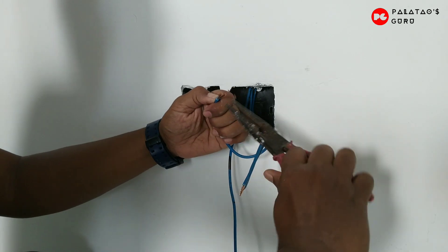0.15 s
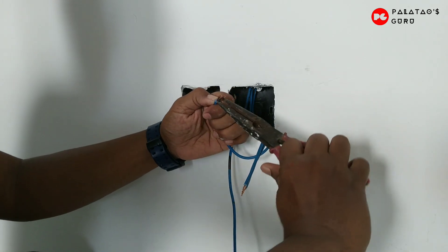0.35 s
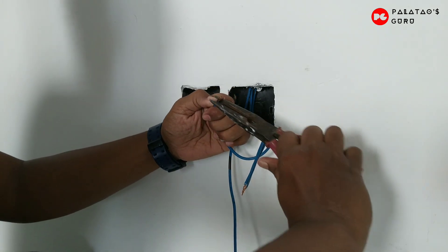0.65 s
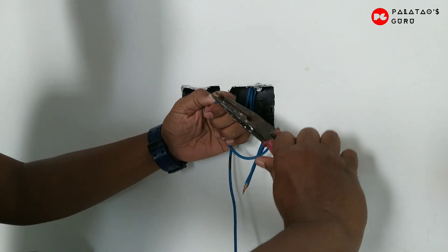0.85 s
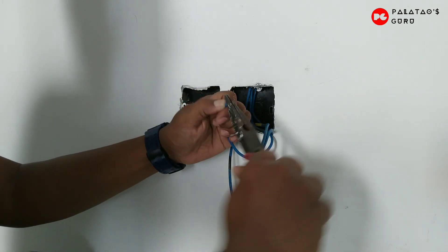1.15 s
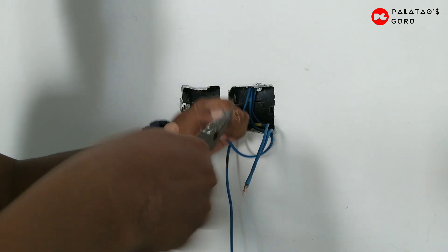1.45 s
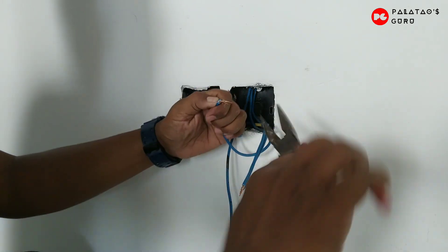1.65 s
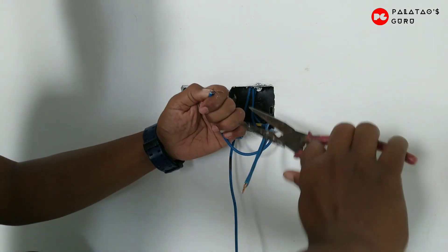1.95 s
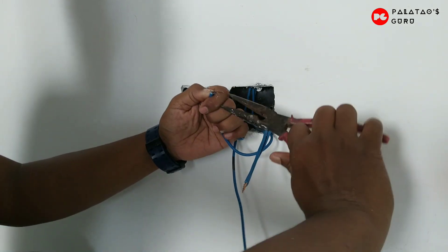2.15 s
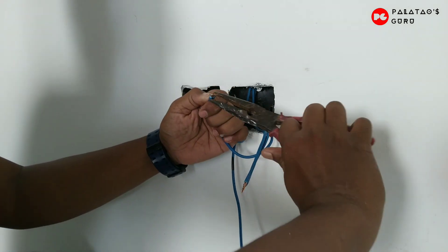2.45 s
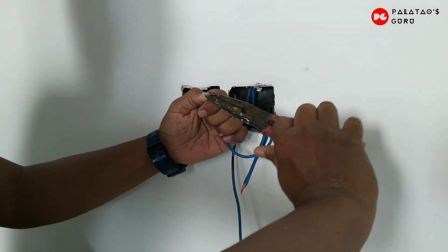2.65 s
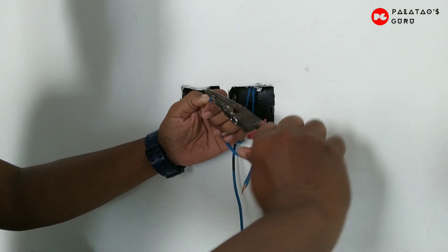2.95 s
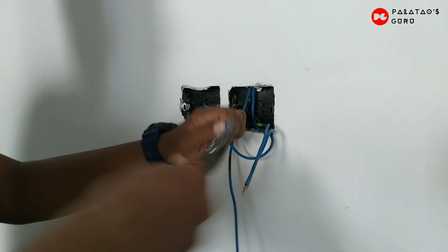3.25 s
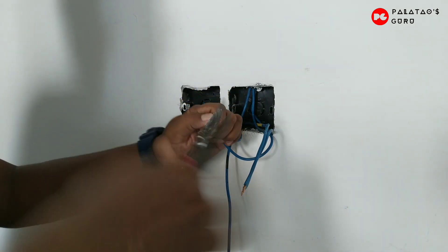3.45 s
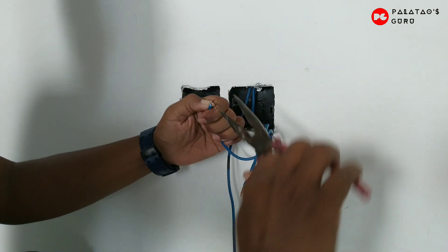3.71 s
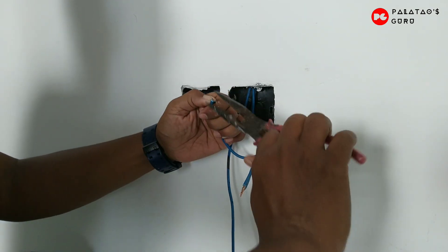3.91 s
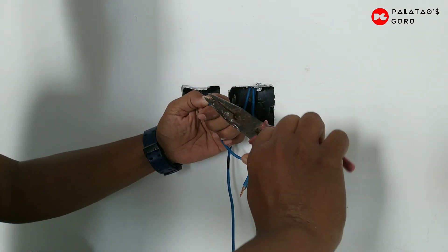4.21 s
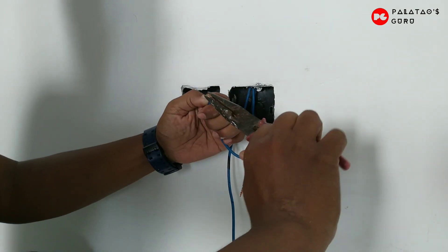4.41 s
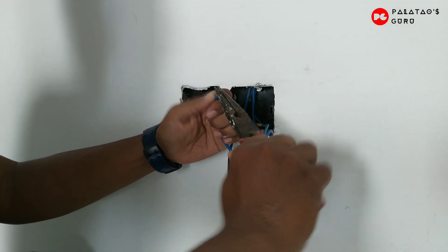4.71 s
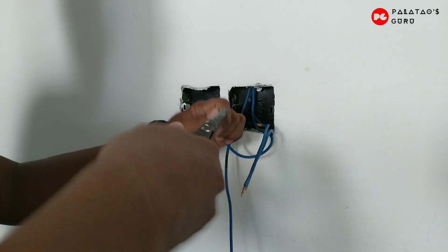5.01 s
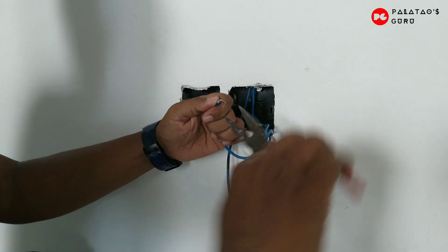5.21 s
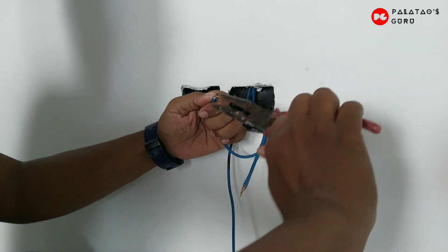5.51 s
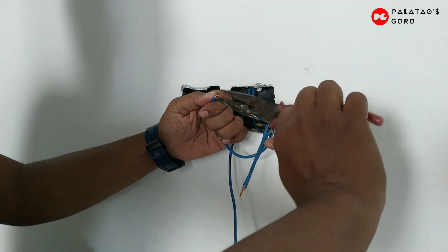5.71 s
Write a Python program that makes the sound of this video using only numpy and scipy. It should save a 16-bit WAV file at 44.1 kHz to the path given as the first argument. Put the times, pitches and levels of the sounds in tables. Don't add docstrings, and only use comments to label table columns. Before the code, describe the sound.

In a bare, hard-walled room, steel jaws grip and twist wire. Hollow box knocks, plastic creaks, bright ticks and short gritty scrapes arrive in separate clusters, strongest before one second and just after three. Between them only soft low hum and muffled air remain. The microphone is close, and gating cuts the echoes short.

```python
import sys
import numpy as np
from scipy import signal
from scipy.fft import rfft, irfft, next_fast_len
from scipy.io import wavfile
from scipy.ndimage import uniform_filter1d

SR = 44100
rng = np.random.default_rng(int(sys.argv[2]) if len(sys.argv) > 2 else 0)


def how_loud(loudness_db):
    steps = np.asarray(loudness_db, float) / 20
    return 10 ** steps


def store_wav(level_fs):
    pcm = np.round(np.clip(np.atleast_2d(level_fs), -1, 1) * 32767)
    wavfile.write(sys.argv[1], SR, pcm.T.astype(np.int16))


N = 258866

# frequency in Hz, wavering in Hz, level in dB.
HUM_TONES = [(127.06, 4.3, -52.5), (190.2, 5.9, -66), (317.5, 11, -70.5)]
# frequency in Hz, level in dB per Hz.
AIR_SPECTRUM = [(180, -29), (300, -2), (343, -9), (372, -4), (462, -9), (494, -1), (528, -11), (574, -9),
                (762, -13.5), (1560, -35.5), (2140, -33), (10600, -49), (16000, -52)]
# frequency in Hz, likeness from 0 to 1.
LEFT_RIGHT_LIKENESS = [(250, 0.17), (500, 0.57), (1000, 0.043), (3000, 0.041), (15000, .05)]
# frequency in Hz, level in dB per Hz.
RUMBLE_SPECTRUM = [(2, 0), (10, 0), (20, -8), (32, -13), (41, 0.5), (50, -6), (62, -12), (76, -4.5),
                   (97, -13), (125, -14.5), (155, -21.5), (230, -26.5), (300, -26.5), (400, -57.5),
                   (700, -150)]
# time in seconds, level in dB.
DEEP_SWELL = [(0.0, -46.5), (0.1, -40.5), (0.38, -46), (0.57, -39.5), (1.68, -41.5), (1.83, -44),
              (2.5, -44.5), (2.84, -44), (3.01, -43.5), (3.3, -45), (4.01, -43), (4.1, -48.5),
              (4.27, -39.5), (4.84, -49), (4.95, -44), (5.5, -37), (5.72, -45.5), (5.87, -42.5)]
# start in seconds, length in seconds, level in dB.
SLIDES = [
    (.64, 0.044, -67),
    (4.36, 0.42, -72.5),
    (4.812, 0.14, -69.5),
]
# start in seconds, length in seconds, force in dB,
# brightness in dB, grip in dB by which the first mode of a group leads.
SCRAPES = [(0.69, 0.024, -50.5, -14.5, -11), (1.051, 0.044, -60.5, 8, 9.5), (1.15, .032, -75.5, 11.5, -11),
           (1.19, 0.054, -72, 12.5, -13), (1.29, 0.06, -55, -10, -4), (1.45, .044, -50.5, -33, -5.5),
           (1.496, 0.028, -53, -2, 3), (1.524, 0.043, -50, 4, 10.5), (1.565, 0.052, -56, -2.5, 0),
           (2.74, 0.039, -60.5, -1.5, -1), (3.211, 0.046, -54, -8, 0.5), (3.259, 0.049, -50.5, -13, 0.5),
           (3.312, 0.04, -56, -1.5, 6), (3.404, .016, -43, -7, 22), (3.415, 0.028, -48.5, 6.5, 14.5),
           (3.447, 0.062, -48.5, -1.5, 21), (3.513, 0.066, -56.5, -1.5, 10.5), (4.29, 0.024, -67.5, 8, 1.5),
           (4.323, 0.025, -60, 7, 3.5), (4.963, 0.069, -58.5, 6.5, -4.5), (5.022, 0.051, -62.5, 5.5, -3),
           (5.087, 0.041, -63.5, 14.5, 5.5), (5.115, 0.047, -58.5, 7.5, 2)]
# frequency in Hz, width in Hz, level in dB.
STEEL_GROUPS = [
    [(2370, 570, -2.5), (2780, 160, 4.5), (2860, 2040, 7)],
    [(4950, 700, 2.5), (5860, 380, -7), (4700, 3000, 10)],
    [(7440, 690, 11.5), (8060, 160, 7), (7680, 1700, 0)],
    [(10700, 790, -6), (11900, 410, -5), (15680, 500, -12), (10350, 1200, -4)],
]
GROUP_DB = [-7, -2, -5]
GROUP_BRIGHT = [0.97, 0.78, 0.99]
GROUP_GRIP = [0.54, 1.2, .15]
# time in seconds, peak in dB, lowest mode in Hz, side mode in dB,
# hardness in dB that wakes the two upper modes.
KNOCKS = [(0.6956, -24, 614, -17.5, -17.5), (1.285, -43.5, 620, -5.5, -3.5), (1.454, -32.5, 626, -11, -8),
          (1.874, -54, 466, -4, -27), (2.963, -46.5, 584, -8.5, -30), (3.091, -46, 610, -4.5, -37),
          (3.196, -42.5, 508, -24, -21), (3.217, -41.5, 686, -8, -11), (3.229, -37, 640, -15.5, -6),
          (3.373, -24.5, 592, -33, -5), (3.993, -39, 598, -12, -31), (4.465, -49.5, 1020, -6, -9),
          (5.202, -40, 670, -9.5, -16.5), (5.595, -48, 616, -16.5, -27.5)]
# time in seconds, peak in dB, lowest mode in Hz,
# side mode in dB, hardness in dB.
THUMPS = [
    (1.047, -46.5, 331, -10.5, -33),
    (1.046, -51, 247, -30, -32),
]
# frequency in Hz, width in Hz.
BOX_MODES = [(1300, 160), (1740, 120), (3050, 210)]
# start in seconds, length in seconds, level in dB.
CREAKS = [(0.704, .05, -44), (.757, .06, -44), (1.289, 0.043, -48), (1.462, 0.085, -42), (1.548, .085, -48),
          (1.882, 0.11, -51.5), (3.223, 0.035, -44.5), (3.257, 0.042, -46), (3.377, .08, -39.5),
          (3.456, 0.067, -45), (3.517, 0.055, -57)]
# frequency in Hz, width in Hz, level in dB.
CREAK_MODES = [(745, 160, 7), (784, 450, 6.5), (1220, 380, -0.5), (1437, 130, 1), (1850, 440, -7)]
# time in seconds, peak in dB, ringing in Hz, crack in dB.
TICKS = [(1.1307, -50, 7200, -6), (1.161, -44.5, 7030, -13), (1.1898, -52.5, 7300, 0),
         (1.2176, -62, 4970, 10), (1.255, -50, 7560, 5), (1.3284, -67, 4700, 8), (1.3526, -62, 5300, 15),
         (1.414, -61.5, 8960, 11), (1.5249, -47.5, 4950, -2.5), (1.5507, -42, 10600, -16),
         (2.7487, -57.5, 6930, -7), (2.7644, -56, 5080, 0), (2.7867, -56, 4700, -2),
         (3.1075, -64, 5130, 13), (3.1324, -48, 7560, -11), (3.1404, -50.5, 7150, .1),
         (3.2794, -50, 7100, -11), (3.293, -41, 7300, -8.7), (3.3109, -40.5, 7590, -16),
         (3.4222, -32.5, 8080, 1), (3.5, -50, 4550, 9.5), (3.5598, -55.5, 4970, 4), (4.0262, -68, 7370, -7),
         (4.302, -48, 7440, -7), (4.3296, -42.5, 7220, -7), (4.352, -55, 4510, 0),
         (4.8843, -49.5, 10940, -7), (5.0877, -60, 4910, 6), (5.1135, -52.5, 4840, 8),
         (5.126, -43, 10750, -5)]
# time in seconds, peak in dB, ringing in Hz, crack in dB.
CLACKS = [(1.048, -44, 2260, 1), (2.6806, -61, 2600, -4), (2.9119, -47.5, 2350, -2),
          (3.407, -32.5, 2560, -5), (4.9613, -44.5, 2790, -5.5), (4.9622, -43, 5800, -9),
          (4.9628, -48.5, 8100, -14), (4.8848, -54, 8140, -9), (1.0495, -51.5, 7100, -2),
          (3.3722, -46, 3900, -12.5), (4.4655, -52, 2560, -16)]
# start in seconds, length in seconds, level in dB.
PIVOT_RUBS = [
    (1.05, .046, -58),
    (4.961, .117, -46.5),
    (3.41, .1, -49.5),
]
# frequency in Hz, width in Hz, level in dB.
PIVOT_MODES = [(2350, 260, -2), (2820, 330, 2), (5800, 450, -3), (8100, 700, -8)]
# frequency in Hz, time to fall 60 dB in seconds.
ROOM_T60 = [(300, 0.68), (600, 0.57), (1500, 0.55), (3000, 0.7), (6000, 0.36), (11000, 0.38)]
# frequency in Hz, left minus right in dB.
PORT_LEAN = [(60, 1.5), (150, -1), (380, -0.5), (950, 0.5), (2380, -0.5), (5980, 6.5), (15000, -8.5)]
# frequency in Hz, gain in dB.
MICROPHONE = [(1000, 4), (9000, 0.2), (11200, -1.5), (12000, -13), (13800, -6.5), (15500, -5)]
# frequency in Hz, gain in dB.
SHUT_GATE = [(200, -0.5), (450, -6), (1000, -13.5), (2000, -20.5), (8000, -19), (16000, -11.5)]
# opens in seconds, shuts in seconds, width in dB.
GATE_OPENINGS = [(0.704, 0.719, -12), (0.726, 0.815, -21), (1.045, 1.093, -8.5), (1.147, 1.177, -5),
                 (1.242, 1.28, -12.5), (1.262, 1.34, -6), (1.448, 1.63, -1.6), (1.865, 1.957, -30),
                 (2.738, 2.805, -8.5), (3.13, 3.15, -6.5), (3.207, 3.589, -1.5), (4.299, 4.355, -8.5),
                 (4.455, 4.482, -5.5), (4.881, 4.901, -7.5), (4.96, 5.08, -6.5), (5.082, 5.17, -5),
                 (5.192, 5.21, -11)]

AIR_DB = -61
DEEP_REFERENCE_DB, MIDDLE_DB, ROCK = -44, -53.5, 0.76
HUM_TURN = 0.9
SLIPS_PER_S, SLIP_SPREAD_DB, CLUMP_DB = 1400, 6.5, 2.5
BITE_S, BITE_DB = 0.0032, -4.5
SCRAPE_EASE, CREAK_EASE, SLIDE_EASE, PIVOT_EASE = 83, 50, -11, 47
CONTACT_TURNS = 5.2
UPPER_DB = -3.5
TICK_T60_S, CLACK_T60_S = 0.012, 0.009
BRIEF_OPEN_S, TICK_WIDE_DB, KNOCK_WIDE_DB = 0.011, -13.5, -17
BAND_EDGE_HZ = 15780


def evened(x):
    return x / np.sqrt(np.mean(x ** 2) + 1e-20)


def read(points, hz):
    f, value = np.transpose(points)
    return np.interp(np.log(hz + 1), np.log(f + 1), value)


def add(mix, s, sound):
    part = mix[round(s * SR):][:len(sound)]
    part += sound[:len(part)]


def level(s, db):
    return how_loud(np.interp(np.arange(N) / SR, s, db, -140, -140))


def coloured(x, points, scale=1):
    size = next_fast_len(N)
    gain = how_loud(scale * read(points, np.fft.rfftfreq(size, 1 / SR)))
    return irfft(rfft(x, size) * gain, size)[..., :N]


def resonate(x, hz, width):
    r = np.exp(-np.pi * width / SR)
    return signal.lfilter([1 - r, 0, r - 1], [1, -2 * r * np.cos(2 * np.pi * hz / SR), r * r], x)


def resonate_twice(x, hz, width):
    return resonate(resonate(x, hz, width), hz, width)


def lowpass(x, hz):
    return signal.sosfiltfilt(signal.butter(4, hz, fs=SR, output="sos"), x)


def noise(points):
    hz = np.fft.rfftfreq(4096, 1 / SR)
    a, b, c, d, patches = rng.standard_normal((N // 1024 + 5, 2049, 5)).T
    patches = uniform_filter1d(patches, size=30, axis=0)
    patches = evened(uniform_filter1d(patches, size=4, axis=1))
    same = np.clip(read(LEFT_RIGHT_LIKENESS, hz), -1, 1)[:, None]
    left = a + 1j * b
    right = same * left + np.sqrt(1 - same ** 2) * (c + 1j * d)
    z = np.array([left, right]) * how_loud(read(points, hz)[:, None] + 0.28 * patches)
    return evened(signal.istft(z, nperseg=4096, noverlap=3072)[1][:, :N])


def machine_hum():
    out = np.zeros((2, N))
    for hz, width, db in HUM_TONES:
        drift = evened(resonate(rng.standard_normal(N), 3.3, 6.55))
        wavering_hz = hz + width * np.roll(drift, 9000)
        phase = 2 * np.pi * np.cumsum(wavering_hz) / SR
        out += how_loud(db + 0.38 * drift) * np.sin(phase + np.array([[HUM_TURN], [0]]))
    return out


def room_air():
    return how_loud(AIR_DB - 4) * coloured(noise(AIR_SPECTRUM), SHUT_GATE, scale=-1)


def rumble():
    shared, *own = rng.standard_normal((3, N))
    x = coloured(shared + 0.45 * np.array(own), RUMBLE_SPECTRUM)
    deep, lower = lowpass(x, 60), lowpass(x, 105)
    s, deep_db = np.transpose(DEEP_SWELL)
    middle_db = MIDDLE_DB - ROCK * (deep_db - DEEP_REFERENCE_DB)
    swelling = evened(deep) * level(s, deep_db) + evened(lower - deep) * level(s, middle_db)
    return swelling + evened(x - lower) * how_loud(-57)


def slipping(modes):
    jumps = how_loud(SLIP_SPREAD_DB * np.minimum(rng.exponential(1, N), 3.5))
    slips = jumps * (rng.random(N) < SLIPS_PER_S / SR)
    slips = evened(slips * rng.choice([-1., 1.], N))
    rasp = rng.standard_normal(N)
    clumps = uniform_filter1d(rasp[::-1], size=300)
    clumps = evened(uniform_filter1d(clumps, size=300))
    slips = (slips + 0.63 * rasp) * how_loud(CLUMP_DB * clumps)
    return [how_loud(db) * evened(resonate_twice(slips, hz, width * 1.5)) for hz, width, db in modes]


def stroke(s, length, db, ease_db_per_s):
    times = [s, s + BITE_S, s + max(length, 2 * BITE_S)]
    return level(times, [db + BITE_DB, db, db - ease_db_per_s * length])


def strokes(rows, ease_db_per_s):
    return sum(stroke(*row, ease_db_per_s) for row in rows)


def scrapes():
    *lower, top = (slipping(group) for group in STEEL_GROUPS)
    top = evened(sum(top))
    out = top * strokes(SLIDES, SLIDE_EASE)
    for s, length, db, bright_db, grip_db in SCRAPES:
        groups = []
        for (first, second, hiss), share in zip(lower, GROUP_GRIP):
            lean = share * grip_db
            groups.append(evened(how_loud(lean) * first + how_loud(-lean) * second + hiss))
        sound, *above = groups + [top]
        for group, group_db, share in zip(above, GROUP_DB, GROUP_BRIGHT):
            sound = sound + how_loud(group_db + share * bright_db) * group
        out += sound * stroke(s, length, db, SCRAPE_EASE)
    return out


def ring(hz, width, onset):
    t = np.arange(3000) / SR
    shape = (1 - np.exp(-t / onset)) * np.exp(-np.pi * width * t)
    return shape / shape.max() * np.sin(2 * np.pi * hz * t)


def knocks():
    out, t = np.zeros(N), np.arange(3000) / SR
    for s, db, hz, side_db, hard_db in KNOCKS + THUMPS:
        grit = rng.standard_normal(3000) * np.exp(-t / 0.005)
        contact = np.sin(np.pi * np.minimum(t * hz / CONTACT_TURNS, 1) ** 0.69)
        body = contact * np.sin(2 * np.pi * hz * t)
        body += how_loud(-5.5) * ring(1.39 * hz, 151.3, 0.00095)
        for (mode_hz, width), mode_db in zip(BOX_MODES, [side_db, hard_db, hard_db + UPPER_DB]):
            rough = resonate_twice(grit, mode_hz, 1100)
            body += how_loud(mode_db) * (ring(mode_hz, width, 0.0012) + 2.2 * rough)
        add(out, s - 0.001, how_loud(db) * body)
    return out


def creaks():
    return how_loud(-2.5) * evened(sum(slipping(CREAK_MODES))) * strokes(CREAKS, CREAK_EASE)


def ticks():
    out = np.zeros(N)
    fade = np.exp(-np.arange(3000) / SR / 0.0013)
    for rows, t60 in [(TICKS, TICK_T60_S), (CLACKS, CLACK_T60_S)]:
        for s, db, hz, crack_db in rows:
            crack = resonate_twice(rng.standard_normal(3000) * fade, 7500, 6500)
            add(out, s, how_loud(db) * (ring(hz, 2.5 / t60, 0.00063) + how_loud(crack_db) * crack))
    return out


def pivot():
    return evened(sum(slipping(PIVOT_MODES))) * strokes(PIVOT_RUBS, PIVOT_EASE)


def room(x, first, early):
    taps = np.zeros((2, SR))
    at = np.arange(first, SR - 20, 20)
    at = at + rng.integers(0, 20, (2, len(at)))
    np.put_along_axis(taps, at, rng.choice([-1., 1.], at.shape), 1)
    taps *= 1 + early * np.exp(-np.arange(SR) / SR / 0.0012)
    hz, t, z = signal.stft(taps, SR, nperseg=256)
    fading = how_loud(-60 * t / read(ROOM_T60, hz)[:, None])
    tail = signal.istft(z * fading, SR, nperseg=256)[1]
    return signal.fftconvolve(x[None], tail / np.linalg.norm(tail[0]), axes=1)[:, :N]


def scene():
    box, jaws = knocks(), ticks()
    rub = scrapes() + creaks() + pivot()
    near = box + how_loud(-6) * jaws + how_loud(-4.5) * rub
    echoes = room(how_loud(-4) * box, 350, 0.12) + room(how_loud(5) * jaws + how_loud(-3) * rub, 20, 16.7)
    left, right = echoes + [np.roll(near, 4), near]
    left = coloured(left, PORT_LEAN, scale=1 / 2)
    right = coloured(right, PORT_LEAN, scale=-1 / 2)
    background = machine_hum() + room_air() + rumble()
    return coloured(np.array([left, right]), MICROPHONE) + background


def gate():
    brief = [(s, s + BRIEF_OPEN_S, TICK_WIDE_DB) for s, *_ in TICKS + CLACKS]
    brief += [(s, s + BRIEF_OPEN_S, KNOCK_WIDE_DB) for s, *_ in KNOCKS]
    wide = np.zeros(N)
    for opens, shuts, db in brief + GATE_OPENINGS:
        wide[round(opens * SR):round(shuts * SR)] = min(how_loud(db), 1)
    return uniform_filter1d(wide, size=130)


def band_limit(x):
    return signal.sosfilt(signal.butter(12, 16240, fs=SR, output="sos"), x)


def record(dry):
    shut = coloured(dry, SHUT_GATE)
    hiss = how_loud(AIR_DB - 0.87) * noise(AIR_SPECTRUM)
    gated = shut + gate() * (dry - shut) + hiss
    edge = signal.firwin(511, BAND_EDGE_HZ, window=("kaiser", 9), fs=SR)
    mix = signal.oaconvolve(gated, edge[None], "same", axes=1)
    return band_limit(mix)


dry = scene()
out = record(dry)
store_wav(out)
```